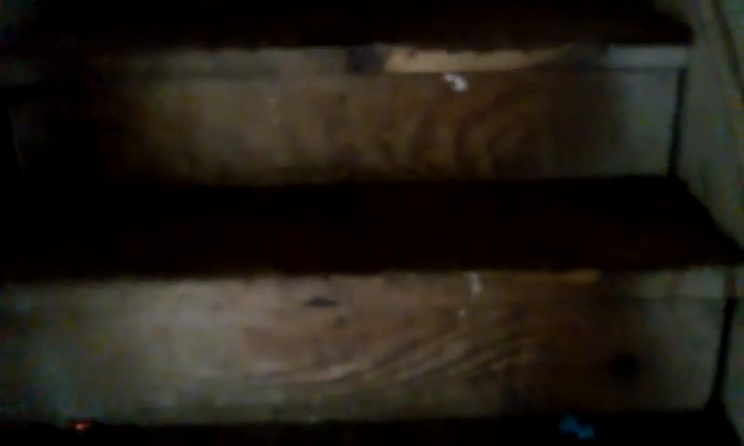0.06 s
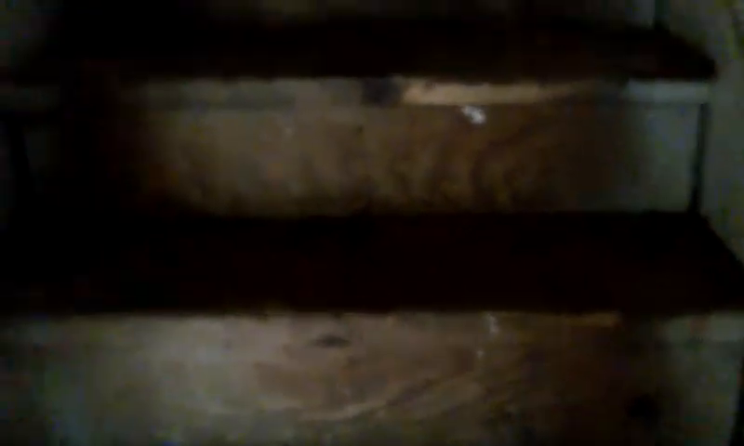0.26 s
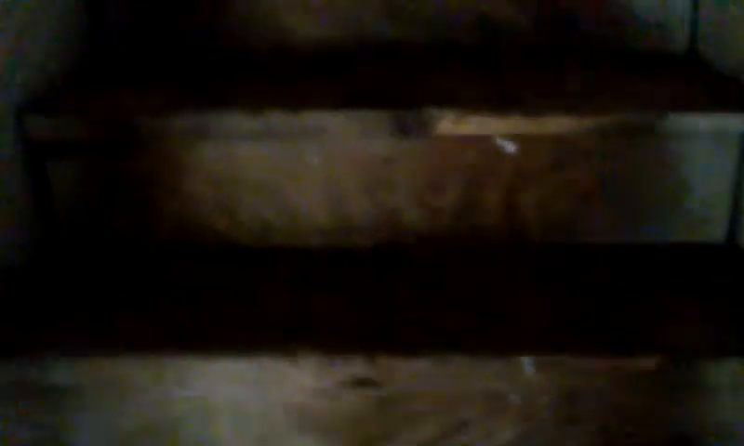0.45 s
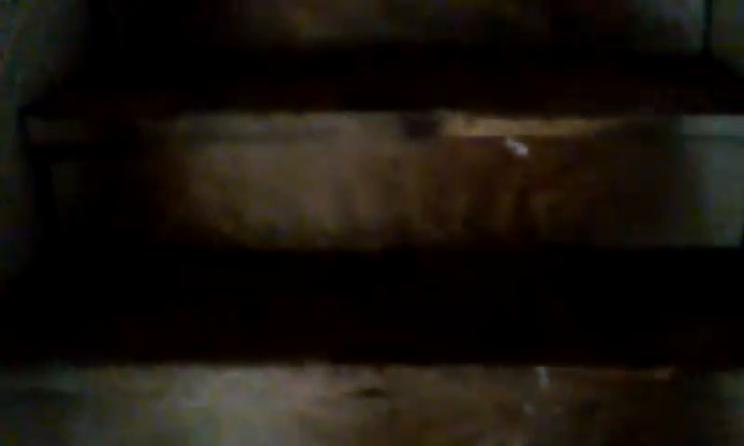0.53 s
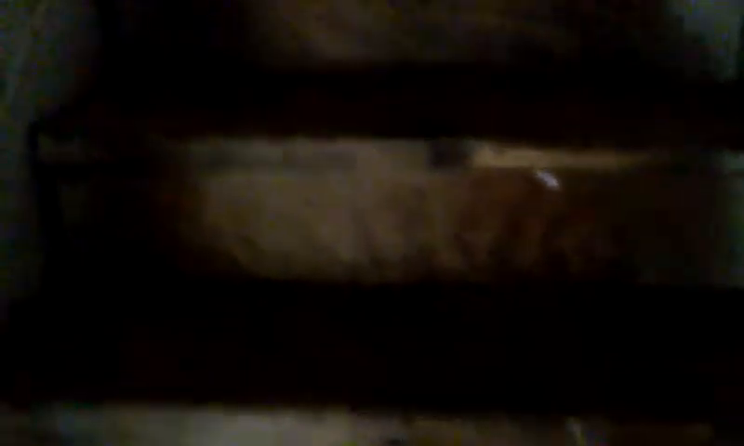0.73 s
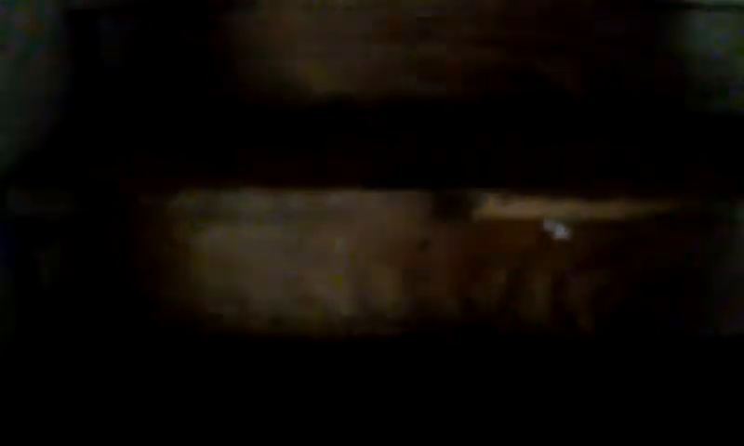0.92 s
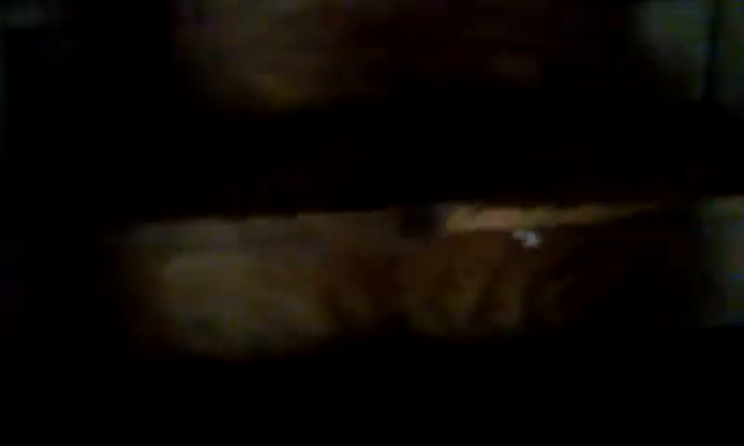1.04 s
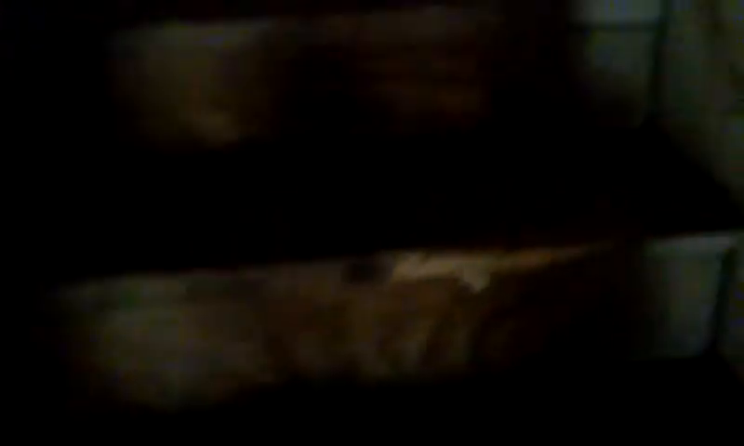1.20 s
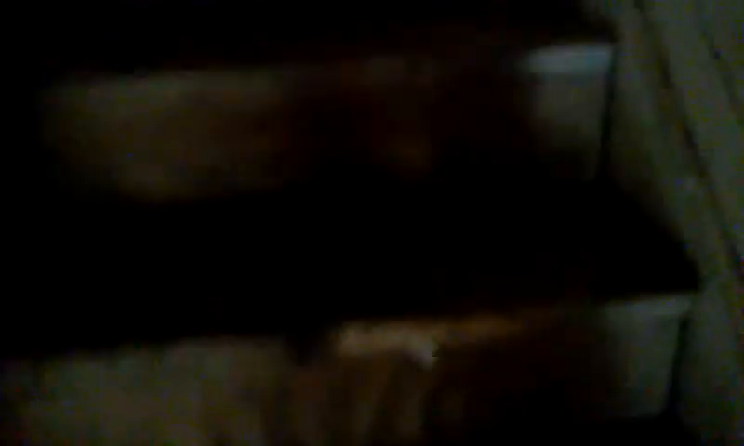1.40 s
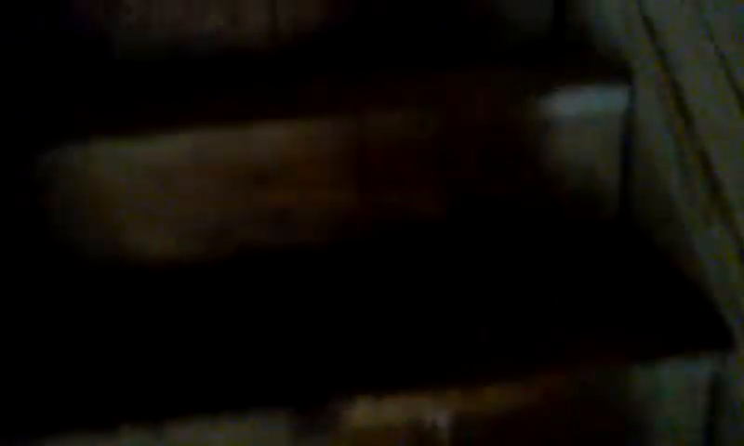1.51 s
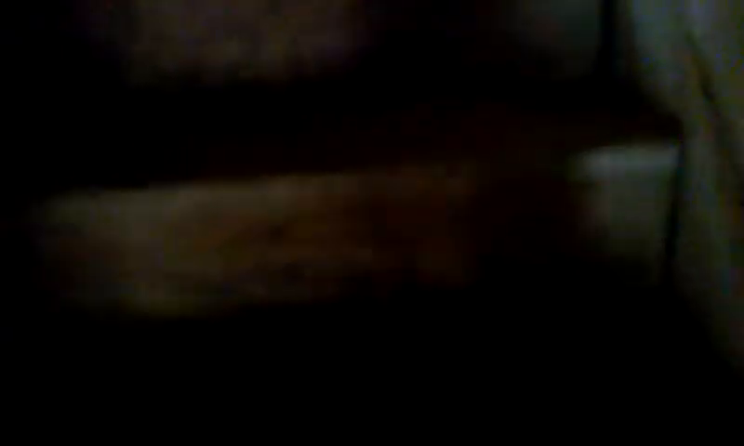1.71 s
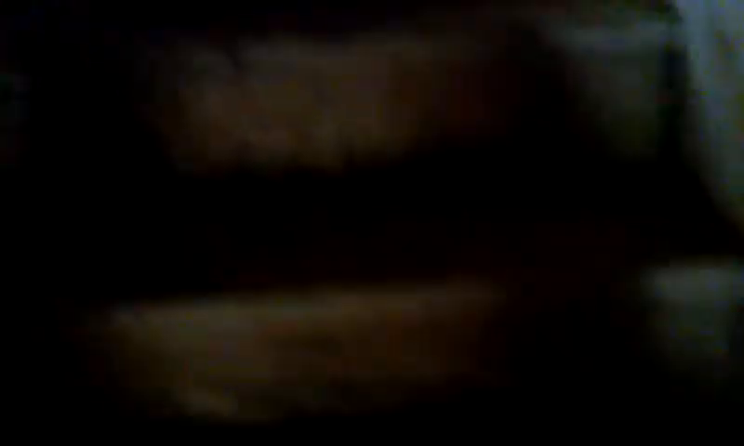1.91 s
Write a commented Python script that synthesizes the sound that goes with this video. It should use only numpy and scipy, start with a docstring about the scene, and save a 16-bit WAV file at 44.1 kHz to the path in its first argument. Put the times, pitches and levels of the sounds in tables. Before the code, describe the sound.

Heavy steps sound close by on old wooden stairs: a creak, two hollow knocks, a scraping, squeaky skid, then a low thud as the boards crack. The stairwell adds a short echo over a faint hum.

```python
"""An earlier step's echo dies away under a thin squeak and a tread creaking in five slips: heavy
feet are climbing worn wooden stairs in a narrow, ringing stairwell. A shoe knocks down twice and
rings the hollow tread; its sole catches and slips on the wood, scraping, squeaking and skidding.
The other shoe shuffles up, the boards crack and the whole flight shudders under the weight.
Room air and a faint hum lie underneath, and a soft noise gate turns the pauses down."""
import sys
import numpy as np
from scipy import signal
from scipy.io import wavfile
from scipy.ndimage import uniform_filter1d

SR = 44100
rng = np.random.default_rng(int(sys.argv[2]) if len(sys.argv) > 2 else 0)


def unload_wav(signal):
    """Save mono or channel-first audio to the path in sys.argv[1] as 16-bit WAV at rate SR, clipped to [-1, 1]."""
    wavfile.write(
        sys.argv[1],
        SR,
        np.round(np.clip(np.atleast_2d(signal).T, -1, 1) * 32767).astype(np.int16),
    )


N = 85995
T = np.arange(N) / SR

# The hollow under a tread. Each row: mode frequency in Hz, relative level in dB, T60 in seconds.
HOLLOW_MODES = [(206, -3.5, 0.19), (246, 5, 0.29), (288, -7.5, 0.65), (345, -10, 0.1), (348, -5, 0.43),
                (395, -12.5, 0.11)]


def amp(db):
    """Decibels to linear gain."""
    return 10 ** (np.asarray(db) / 20)


def curve_at(points, hz):
    """Reads a curve along a log-frequency axis."""
    freqs, values = np.transpose(points)
    return np.interp(np.log(hz + 1), np.log(freqs + 1), values)


def unit_rms(x):
    """Scales the whole signal to rms 1."""
    return x / np.sqrt(np.mean(x ** 2) + 1e-20)


def unit_loudest(x):
    """Scales the loudest stretch to rms 1."""
    return x / np.sqrt(uniform_filter1d(x ** 2, 1800).max() + 1e-20)


def since(start):
    """Seconds since the start, zero before it."""
    return np.maximum(T - start, 0)


def wobble(samples):
    """Random modulation of rms 1: noise smoothed over so many samples."""
    return unit_rms(uniform_filter1d(rng.standard_normal(N), samples))


def burst(start, peak_s):
    """A puff of noise that swells to its peak and dies away."""
    u = since(start) / peak_s
    return u * np.exp(1 - u) * rng.standard_normal(N)


def colour(x, eq, size=4096):
    """Minimum-phase EQ of unit energy: the curve sets only the tone."""
    hz = abs(np.fft.fftfreq(size, 1 / SR))
    log_gain = np.log(amp(np.maximum(curve_at(eq, hz), -100)))
    taps = np.fft.ifft(np.exp(np.conj(signal.hilbert(log_gain)))).real[:size // 2]
    return signal.fftconvolve(x, taps / np.linalg.norm(taps))[:N]


def stairwell(x, wet_db, stretch=1):
    """Near walls add a dense tail, each band dying at its own speed; stretch scales the decay times."""
    # The stairwell's decay. Each row: frequency in Hz, T60 in seconds at a stretch of 1.
    room_t60 = [(60, 0.45), (150, 0.72), (400, 0.55), (1000, 0.49), (2700, 0.44), (7000, 0.46),
                (15000, 0.61)]
    hz, t, bands = signal.stft(rng.standard_normal(SR), SR, nperseg=256)
    t60 = stretch * curve_at(room_t60, hz)[:, None]
    tail = signal.istft(bands * amp(-60 * t / t60), SR, nperseg=256)[1][:SR]
    tail *= np.clip((T[:SR] - .002) / 0.0028, 0, 1)  # pre-delay, then a quick fade-in
    return x + amp(wet_db) * signal.fftconvolve(x, tail / np.linalg.norm(tail))[:N]


def ring(modes, start, rise):
    """A blow sets wooden modes ringing as decaying sines."""
    t = since(start)
    partials = sum(amp(db - 60 * t / t60) * np.sin(2 * np.pi * (hz * t + rng.random()))
                   for hz, db, t60 in modes)
    return unit_loudest((1 - np.exp(-t / rise)) * partials)


def rub(envelope, eq, per_s, spread_db, hiss, pulse_db, wet_db, stretch=1):
    """Friction: many tiny catches under one stroke, bunched by an uneven stick and slip."""
    slip_hz, slip_jitter = 89.7, 0.19
    catches = (rng.random(N) < per_s / SR) * rng.choice([-1, 1], N)
    strength = amp(spread_db * np.minimum(rng.exponential(1, N), 4))
    slip_cycles = np.cumsum(slip_hz * (1 + slip_jitter * wobble(500))) / SR
    grain = unit_rms(catches * strength) + hiss * rng.standard_normal(N)
    grain *= amp(pulse_db * np.cos(2 * np.pi * slip_cycles))
    times, db = np.transpose(envelope)
    stroke = unit_rms(colour(grain, eq)) * amp(np.interp(T, times, db, left=-120, right=-120))
    return stairwell(stroke, wet_db, stretch) / np.hypot(1, amp(wet_db))


def background():
    """The end of an earlier step's echo, over room air and a faint hum."""
    # Tone of the air and of the echo. Each row: frequency in Hz, relative gain in dB.
    air_eq = [(25, -14), (60, 2), (120, 1), (170, -3), (300, -19), (550, -23), (900, -10.5), (2000, -76),
              (3500, -34), (9000, -37.5), (16000, -39.5)]
    echo_eq = [(24, -46), (40, 3.5), (132, -36), (245, -1), (276, -12.5), (351, -10.5), (593, -24.5),
               (718, -14), (1130, -23), (1620, -11.5), (2610, -28), (3470, -36.5), (12000, -60),
               (15600, -99), (22000, -120)]
    echo_t60, hum_hz = 0.43, 116.2
    air, echo = (unit_rms(colour(rng.standard_normal(N), eq)) for eq in (air_eq, echo_eq))
    hum = np.sin(2 * np.pi * hum_hz * T)
    return amp(-34.5 - 60 * T / echo_t60) * echo + amp(-49) * air + amp(-47.5) * hum


def squeaks():
    """Wood and rubber stick and slip fast: a wavering tone, whose octave dies sooner in the stairwell."""
    # Each row is a squeak: start and length in seconds, first and last pitch in Hz, level in dB,
    # octave in dB relative to the tone, waver as a fraction of the pitch.
    glides = [(0.086, 0.044, 725, 718, -49.5, -22, .012), (0.128, 0.13, 1063, 1025, -40.5, -3, 0.0085),
              (0.777, 0.081, 1248, 1282, -30.5, -21, .06), (0.985, 0.009, 8200, 7900, -32.5, -25, .03),
              (0.988, 0.046, 7130, 7170, -24.5, -9.5, 0.0075), (0.995, 0.008, 6340, 6370, -26, -25, .015),
              (1.033, 0.051, 2687, 2630, -34, -10, 0.015), (1.087, 0.013, 7140, 7170, -31, -20, 0.0125),
              (1.389, 0.083, 575, 628, -41.5, -22, 0.052), (1.632, 0.03, 601, 571, -33.5, -17, 0.0403),
              (1.717, 0.055, 976, 825, -37.5, -27, 0.042)]
    flutter_db = 2.5
    tones, octaves = np.zeros((2, N))
    for start, length, first_hz, last_hz, db, octave_db, waver in glides:
        progress = np.clip((T - start) / length, 0, 1)
        hz = (first_hz + (last_hz - first_hz) * progress) * (1 + waver * wobble(160))
        phase = 2 * np.pi * np.cumsum(hz) / SR
        level = amp(db + flutter_db * wobble(160)) * (4 * progress * (1 - progress)) ** 0.16
        tones += level * np.sin(phase)
        octaves += level * amp(octave_db) * np.sin(2 * phase)
    return stairwell(tones, wet_db=-7, stretch=.9) + stairwell(octaves, wet_db=-7, stretch=.5)


def creak():
    """Each slip of a joint is a rounded chirp that sags as the strain lets go; it also knocks the board."""
    # Each row is a slip: start in seconds, level in dB, settled pitch in Hz.
    slips = [(0.1457, -17.5, 1802), (0.1738, -15.5, 1802), (0.2054, -16, 1790), (0.236, -17, 1777),
             (0.2767, -16.5, 1765), (1.080, -16.5, 2090), (1.095, -18, 2180), (1.1316, -19, 1915)]
    # Each row is a joint mode: multiple of the pitch, relative level in dB, time to peak in seconds.
    joint_modes = [(.92, -3, 0.0013), (1.03, -7, 0.0017), (2.08, -20.5, 0.0019), (2.42, -16, 0.002),
                   (3.35, -25, 0.0017), (4.3, -15.5, 0.0007), (5.2, -16, 0.00047), (7.2, -29.5, .0004)]
    # The board around the joint. Each row: frequency in Hz, relative gain in dB.
    board_eq = [(100, -8.5), (200, 0), (330, -0.5), (430, 5.5), (540, -14.5), (700, 0), (950, -3.5),
                (1200, -12), (1700, -12.5), (2300, -8.5), (3200, -22), (6300, -15), (11000, -26),
                (16000, -37.5)]
    sag, sag_s, shock_s = .2, .0018, 0.002
    chirps, shocks = np.zeros((2, N))
    for start, db, hz in slips:
        t = since(start)
        cycles = hz * (t + sag * sag_s * (1 - np.exp(-t / sag_s)))
        for multiple, mode_db, peak_s in joint_modes:
            swell = (t / peak_s * np.exp(1 - t / peak_s)) ** 1.4
            chirps += amp(db + mode_db) * swell * np.sin(2 * np.pi * multiple * cycles)
        shocks += amp(db) * (t > 0) * np.exp(-t / shock_s) * rng.standard_normal(N)
    joint = stairwell(chirps, wet_db=-7.5, stretch=.9)
    board = stairwell(colour(shocks, board_eq), wet_db=0.5, stretch=.85)
    return joint + amp(-8) * board


def knocks():
    """A soft touch, the snap of the heel, then a short clatter that rings the tread and its hollow."""
    # Each row is a shoe knock: start in seconds, clatter level in dB, rise in seconds,
    # then the levels of tread, hollow, touch and snap in dB.
    hits = [(0.4468, -17, 0.007, -20, -26, -26, -32), (0.6215, -18, 0.00075, -23, -40, -22.5, -36),
            (1.552, -35, 0.0011, -55, -35.5, -43, -41.5), (1.632, -34.5, 0.0011, -44, -38.5, -46, -43)]
    # Tone of the soft sole, hard heel edge and clatter. Each row: frequency in Hz, relative gain in dB.
    touch_eq = [(60, 18), (250, -14), (530, 2.5), (800, 11.5), (2000, -1), (3000, -18.5), (6000, -16.5),
                (15000, -73)]
    snap_eq = [(1500, -11), (3200, -3.5), (5500, -8.5), (8300, -2), (11000, -10.5), (15500, -27)]
    clatter_eq = [(50, -25), (110, -8.5), (240, -13.5), (400, -5), (530, -16), (640, -2.5), (820, -3),
                  (1450, -4), (2150, -9.5), (3000, -20.5), (5400, -18), (8000, -29), (12400, -44.5),
                  (16000, -57)]
    # Each row is a mode of the tread: frequency in Hz, relative level in dB, T60 in seconds.
    tread_modes = [(652, -9, 0.18), (821, -2, 0.28), (876, -8, 0.22), (1018, -18, .5), (1099, -7, 0.38),
                   (1199, -12, 0.33), (1437, -11, 0.33), (1503, -13, .45)]
    touch_lead_s, touch_rise_s, hollow_lead_s, contact_s = .012, 0.0086, 0.01033, 0.012
    out = np.zeros(N)
    for start, clatter_db, rise, tread_db, hollow_db, touch_db, snap_db in hits:
        t, u = since(start), since(start - touch_lead_s) / touch_rise_s
        out += amp(touch_db) * u * np.exp(1 - u) * unit_rms(colour(rng.standard_normal(N), touch_eq))
        out += amp(snap_db) * stairwell(colour(burst(start, peak_s=0.0058), snap_eq), wet_db=-15)
        contact = rng.standard_normal(N) * (1 - np.exp(-t / rise)) * np.exp(-t / contact_s)
        out += amp(clatter_db) * unit_loudest(stairwell(colour(contact, clatter_eq), wet_db=8))
        out += amp(tread_db) * ring(tread_modes, start, rise)
        out += amp(hollow_db) * ring(HOLLOW_MODES, start - hollow_lead_s, rise=0.0047)
    return out


def thuds():
    """Body weight sets the flight swaying and its boards booming."""
    # Each row is a landing: start, rise and hold in seconds, then sway and boom levels in dB.
    landings = [(0.453, 0.0064, 0.014, -57, -32), (1.057, 0.024, 0.02, -35, -27.5),
                (1.362, 0.022, 0.015, -59, -47.5), (1.491, 0.029, 0.027, -26, -32),
                (1.546, 0.0049, 0.057, -18, -25.5), (1.724, 0.024, 0.03, -46, -40)]
    # The booming boards. Each row: frequency in Hz, relative gain in dB.
    boom_eq = [(25, -20), (55, -14), (75, 8), (95, -7.5), (122, 3), (175, -6), (260, -12.5), (380, -4.5),
               (450, -6), (540, -59.5), (1500, -61.5)]
    sway_hz, sway_t60, boom_t60 = 43.4, 0.11, 0.21
    out = np.zeros(N)
    for start, rise, hold, sway_db, boom_db in landings:
        t, release = since(start), since(start + rise + hold)
        load = np.minimum(t / rise, 1)
        out -= amp(sway_db - 60 * release / sway_t60) * load * np.sin(2 * np.pi * sway_hz * t)
        boom = colour(rng.standard_normal(N), boom_eq) * load * amp(-60 * release / boom_t60)
        out += amp(boom_db) * unit_loudest(stairwell(boom, wet_db=-10.5, stretch=0.67))
    return out


def scrape():
    """The sole drags over the tread, with a high rasp of rubber on top; later the same high layer carries a
    soft rustle of cloth."""
    # Envelopes of the drag and the rasp. Each row: time in seconds, level in dB.
    drag_env = [(.76, -33), (.835, -39), (.87, -23.5), (.895, -24.5), (.925, -21), (.95, -33.5),
                (.98, -26.5), (.99, -24), (1.01, -35.5), (1.04, -62)]
    rasp_env = [(.825, -53), (.85, -38), (.9, -36.5), (.928, -34), (.95, -46), (1.0, -39), (1.33, -73.5),
                (1.38, -63.5), (1.48, -60), (1.6, -57)]
    # Their tone. Each row: frequency in Hz, relative gain in dB.
    drag_eq = [(60, -36), (130, -18), (240, -7.5), (400, -4), (510, -15), (620, -6.5), (860, -10.5),
               (1150, -9), (2140, -11.5), (3000, -26), (4700, -20), (9000, -35.5), (16000, -45)]
    rasp_eq = [(1000, -14), (3200, -21), (4700, -4), (6000, -11), (7500, 0.5), (9300, 0), (10500, -9),
               (14000, -10), (16000, -57)]
    drag = rub(drag_env, drag_eq, per_s=1300, spread_db=3.5, hiss=1, pulse_db=3.5, wet_db=-0.5)
    rasp = rub(rasp_env, rasp_eq, per_s=7400, spread_db=8, hiss=0.67, pulse_db=4.5,
               wet_db=-8, stretch=0.66)
    return drag + rasp


def bumps():
    """The rolling sole bumps the hollow tread."""
    # Each row is a bump: start in seconds, level in dB, rise in seconds.
    hits = [(0.892, -26, .032), (.974, -32, 0.004)]
    return sum(amp(db) * ring(HOLLOW_MODES, start, rise) for start, db, rise in hits)


def judder():
    """The sole judders as it twists to a stop."""
    # The twist. Each row: time in seconds, level in dB.
    envelope = [(.98, -45), (.988, -33), (1.026, -42), (1.036, -30), (1.06, -27), (1.095, -29.5),
                (1.135, -39), (1.18, -60)]
    # Its tone. Each row: frequency in Hz, relative gain in dB.
    eq = [(120, -26), (200, -8.5), (283, -18), (424, -9), (647, -22.5), (851, -11.5), (1500, -19.5),
          (2050, -9.5), (2700, -19), (3190, -32.5), (4200, -21), (7270, -23.5), (8420, -33), (14300, -55),
          (16000, -55)]
    return rub(envelope, eq, per_s=1500, spread_db=2.5, hiss=0.31, pulse_db=1.5, wet_db=6, stretch=0.75)


def skid():
    """The rubber's squeak breaks up into a harsh skid."""
    # The slide. Each row: time in seconds, level in dB.
    envelope = [(1.028, -64), (1.037, -28), (1.062, -25), (1.085, -38), (1.11, -54)]
    # Its bright tone. Each row: frequency in Hz, relative gain in dB.
    eq = [(1500, -46), (2300, -8), (2700, -15), (3200, -17), (4150, 3), (4800, 3.5), (5700, -7), (6400, 2),
          (8200, -11.5), (9500, -3.5), (10500, -11.5), (11900, -6.5), (16000, -33)]
    return rub(envelope, eq, per_s=1700, spread_db=2, hiss=0.6, pulse_db=2.5, wet_db=-3, stretch=0.65)


def shuffle():
    """The other shoe rubs its way onto the next tread."""
    # The stroke. Each row: time in seconds, level in dB.
    envelope = [(1.3, -49.5), (1.36, -53), (1.382, -43.5), (1.41, -50), (1.48, -51), (1.52, -36),
                (1.55, -35.5), (1.58, -37), (1.62, -34.5), (1.645, -32), (1.68, -35.5), (1.74, -34.5),
                (1.8, -52.5), (1.9, -53)]
    # Its dull tone. Each row: frequency in Hz, relative gain in dB.
    eq = [(59, -37), (100, 0.5), (181, -8), (249, 2), (461, -14.5), (570, 1), (691, -5.5), (872, -3),
          (2080, -10.5), (3190, -24.5), (4110, -22), (8460, -28.5), (16000, -36.5)]
    return rub(envelope, eq, per_s=1300, spread_db=-3, hiss=1, pulse_db=1.5, wet_db=-2)


def cracks():
    """Boards crack under the shifting load: a bright tick and a duller crunch."""
    # Each row is a crack: start in seconds, tick gain in dB, time to peak in seconds, crunch gain in dB.
    hits = [(1.304, -38, 0.00051, -55), (1.348, -47, 0.0014, -61), (1.496, -41, 0.00037, -28),
            (1.5067, -28, 0.00074, -31), (1.5295, -28.5, .0007, -48), (1.546, -24.5, 0.0012, -17.5),
            (1.551, -44, 0.0026, -17.5), (1.59, -20, 0.0013, -42), (1.634, -28.5, 0.0014, -35)]
    # Tone of the tick and of the crunch. Each row: frequency in Hz, relative gain in dB.
    tick_eq = [(300, -6.5), (1400, 0.5), (2250, 9.5), (3000, -10), (4500, -1), (7000, -4), (8500, 0.5),
               (9900, 1), (12000, -13), (16000, -24)]
    crunch_eq = [(150, -3), (400, 16), (530, -3.5), (800, 15), (1500, 1.5), (2400, 6.5), (2900, -35),
                 (3500, -2), (6400, -22), (9000, -27), (16000, -39)]
    ticks, crunches = np.zeros((2, N))
    for start, tick_db, peak_s, crunch_db in hits:
        snap = .5 * burst(start, peak_s)
        ticks += amp(tick_db) * snap
        crunches += amp(crunch_db) * snap
    return stairwell(colour(ticks, tick_eq) + colour(crunches, crunch_eq), wet_db=-6)


def scene():
    """Room, shoes and stairs, mixed to mono."""
    mix = background() + squeaks() + creak() + knocks() + thuds()
    mix += scrape() + bumps() + judder() + skid() + shuffle() + cracks()
    return mix[None]


def record(dry):
    """A soft noise gate, deaf to rumble, turns quiet moments down; a low-pass trims the very top."""
    key_hz, window_s, cutoff_hz = 900, .02, 15900
    threshold_db, slope, depth_db = -52, 3, 16
    key = signal.sosfilt(signal.butter(2, key_hz, "high", fs=SR, output="sos"), dry[0])
    key_db = 10 * np.log10(abs(uniform_filter1d(key ** 2, int(window_s * SR))) + 1e-12)
    cut_db = np.clip((threshold_db - key_db) * slope, 0, depth_db)
    gated = dry * amp(-uniform_filter1d(cut_db, size=500))
    taps = signal.firwin(401, cutoff_hz, window=("kaiser", 8), fs=SR)
    return signal.oaconvolve(gated, taps[None], "same")


dry = scene()
out = record(dry)
unload_wav(out)
```